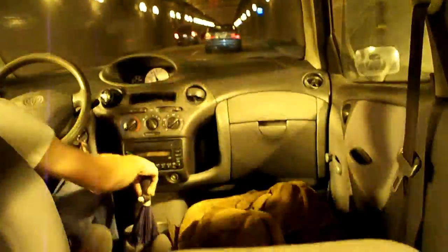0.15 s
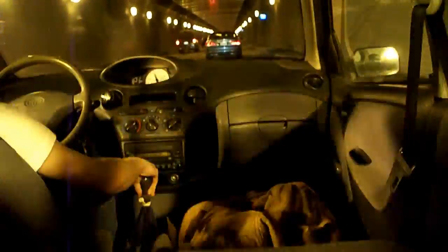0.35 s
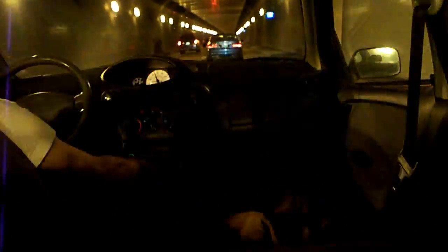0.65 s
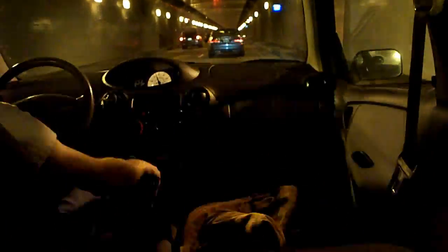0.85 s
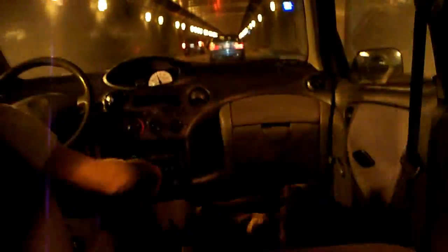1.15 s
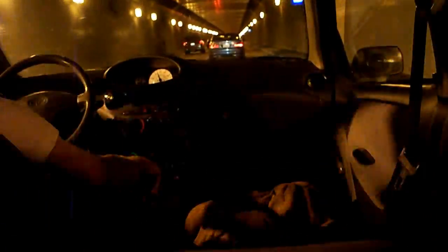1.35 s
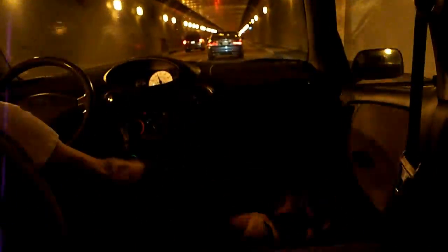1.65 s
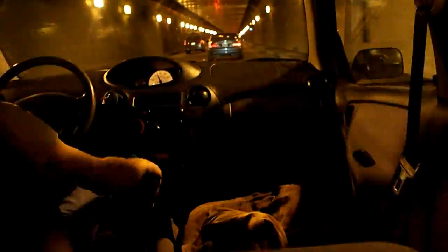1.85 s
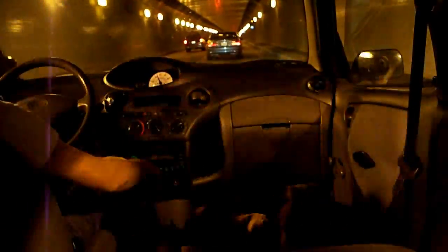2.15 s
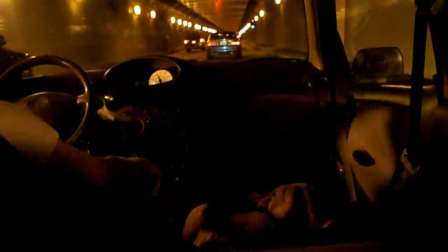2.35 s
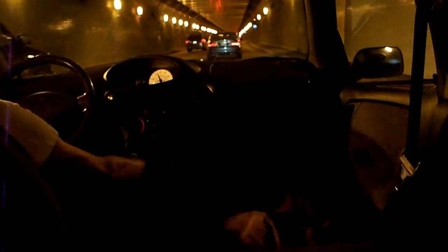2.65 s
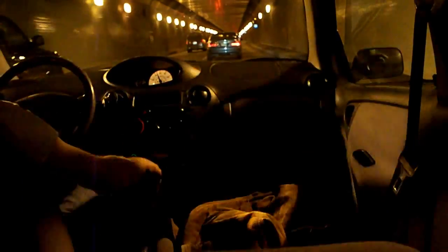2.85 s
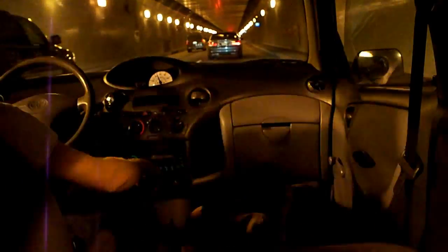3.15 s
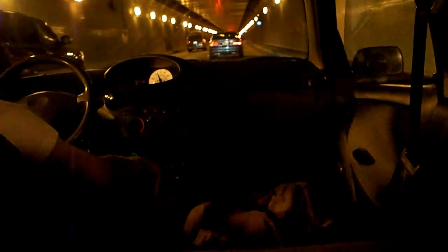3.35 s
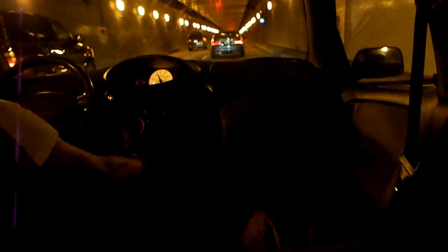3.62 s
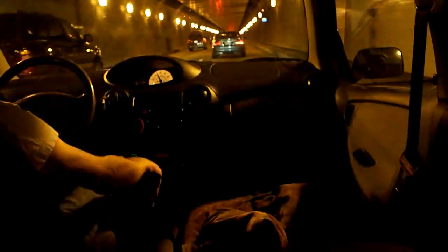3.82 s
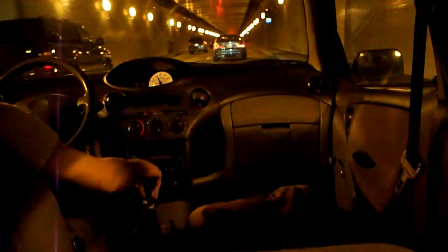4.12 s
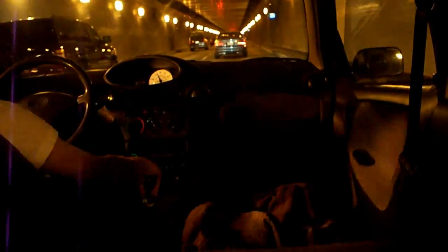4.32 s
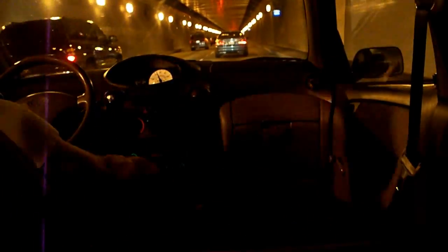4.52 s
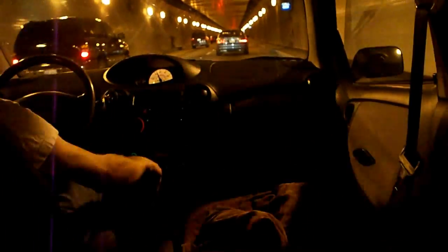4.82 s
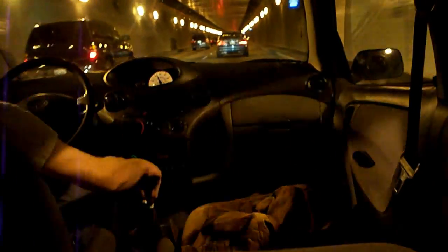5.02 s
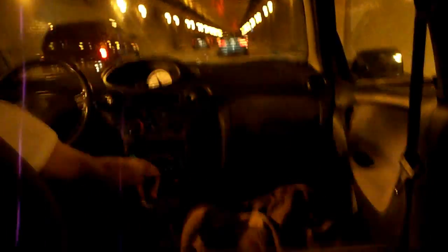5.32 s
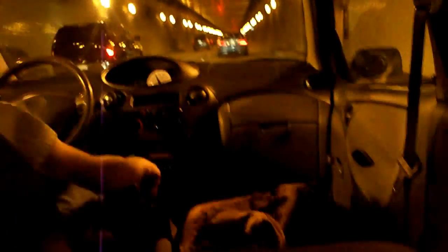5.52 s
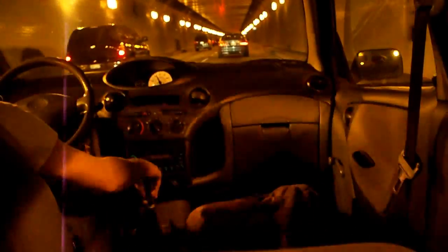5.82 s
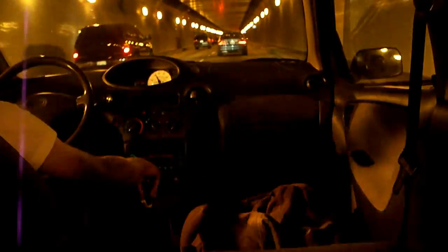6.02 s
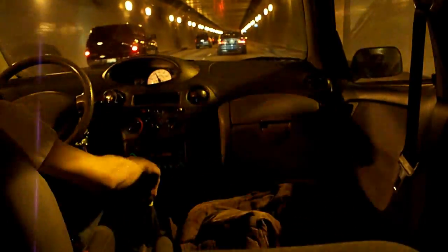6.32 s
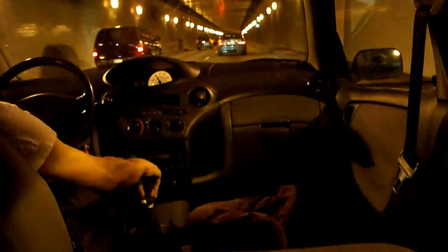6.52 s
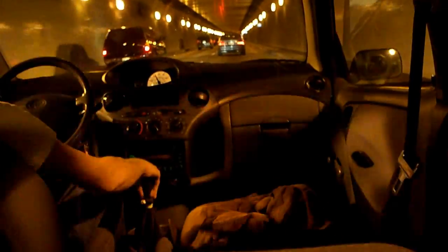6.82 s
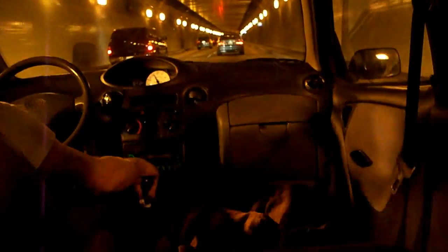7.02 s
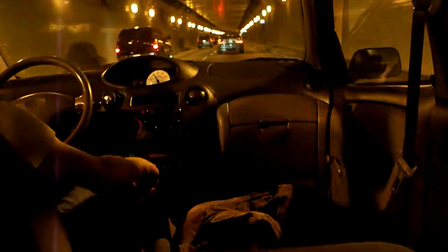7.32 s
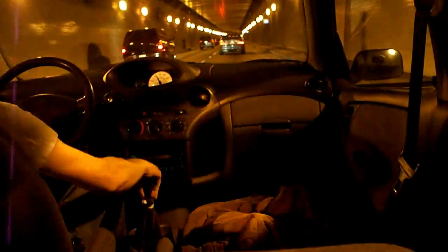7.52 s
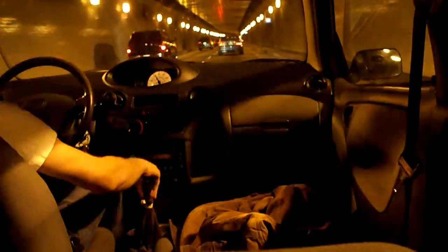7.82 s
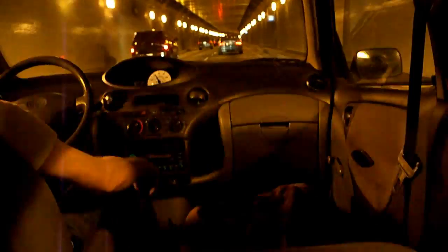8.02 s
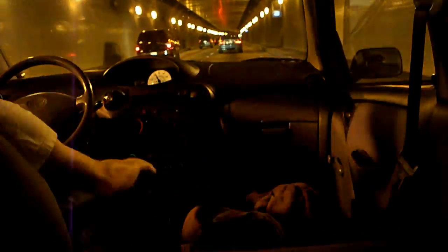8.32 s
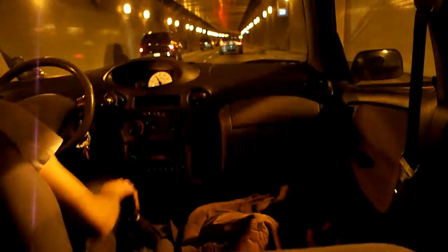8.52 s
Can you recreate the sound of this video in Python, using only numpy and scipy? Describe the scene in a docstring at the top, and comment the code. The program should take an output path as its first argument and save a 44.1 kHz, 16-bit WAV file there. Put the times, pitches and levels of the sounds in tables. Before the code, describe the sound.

Inside a small car cruising through a road tunnel, tyre roar and a broad rush lie over body rumble and a faint engine hum. Loose plastic trim rattles at the start, among thin clicks and dry ticks. Uneven road then brings tyre slaps, low booms and a few dull thuds. The rattling is densest just past the middle, then thins out while the roar carries on. It is heard from behind the front seats.

```python
"""Inside a small car cruising through a road tunnel, heard from behind the front seats.
From the start, tyre roar and a broad rush lie over body rumble, faint engine hum, hiss and crackle.
Loose plastic trim rattles at once, among thin, high clicks and dry ticks. Near 1 s uneven road begins
to slap the tyres and make the cabin boom; from 2 s there are a few short, dull, low thuds and pops.
The rattling is densest between 5 and 6 s, then thins out while the roar carries on."""
import sys
import numpy as np
from scipy.fft import rfft, irfft, next_fast_len
from scipy.io import wavfile
from scipy.ndimage import map_coordinates

SR = 44100
rng = np.random.default_rng(int(sys.argv[2]) if len(sys.argv) > 2 else 0)


def digitize_waveform(pressure):
    """Quantize a signal to 16-bit integers and store it at the path in sys.argv[1].

    Rows of a 2-D input are taken as channels; values are limited to [-1, 1].
    """
    field = np.atleast_2d(pressure).T
    bounded = np.clip(field, -1, 1)
    quanta = np.round(bounded * 32767).astype(np.int16)
    wavfile.write(sys.argv[1], SR, quanta)


N = 382112

# tyre roar, building over each coarse stretch of asphalt and dropping at its end: t/s, level/dB
ROAR_LEVELS = [(0.02, -34), (0.14, -32.5), (0.4, -33.5), (0.7, -31.5), (1.02, -29.5), (1.07, -36),
               (1.4, -30.5), (1.6, -33), (1.85, -30.5), (2.06, -29), (2.11, -33.5), (2.3, -30.5),
               (2.55, -30.5), (2.93, -30), (3.02, -27), (3.08, -30.5), (3.48, -25), (3.55, -34.5),
               (3.93, -32.3), (4.1, -28.5), (4.42, -27), (4.5, -30.5), (4.68, -28), (4.9, -30.5),
               (5.18, -29.5), (5.35, -33), (5.7, -29), (5.96, -28.5), (6.02, -31.5), (6.5, -31.5),
               (7.15, -32), (7.4, -30), (7.7, -33), (7.85, -31), (7.98, -28), (8.05, -33.5), (8.6, -30.5)]


def amp(db):
    """Amplitude ratio of a level in decibels."""
    return 10 ** (np.asarray(db) / 20)


def unit(x):
    """Normalisation to rms 1."""
    return x / np.sqrt(np.mean(x ** 2) + 1e-20)


def envelope(rows):
    """Linear interpolation of (t/s, level/dB) rows to one level per sample."""
    times, levels = np.transpose(rows)
    return np.interp(np.arange(N) / SR, times, levels)


def wobble(rate):
    """Smooth random modulation: a spline through rate knots a second."""
    knots = rng.standard_normal(int(N * rate / SR) + 4)
    return map_coordinates(knots, [np.arange(N) * rate / SR])


def filtered(x, response):
    """Zero-phase filtering: the spectrum of x times a response of frequency."""
    size = next_fast_len(len(x) + SR // 4)
    return irfft(rfft(x, size) * response(np.fft.rfftfreq(size, 1 / SR)), size)[:len(x)]


def coloured(x, points):
    """Spectral shaping by (f/Hz, level/dB) points on a log axis, cut off above the last."""
    f, db = np.transpose(points)
    return filtered(x, lambda hz: amp(np.interp(np.log(hz + 1), np.log(f), db, right=-120)))


def noise(points):
    """Gaussian noise of rms 1 with the given spectral shape."""
    return unit(coloured(rng.standard_normal(N), points))


def grains(rate, spread_db):
    """A Poisson train of unequal impulses, rms 1."""
    chance, size, sign = rng.random(N), rng.standard_normal(N), rng.choice([-1, 1], N)
    return unit((chance < rate / SR) * sign * amp(spread_db * np.clip(size, -2, 2)))


def add(track, s, sound):
    """Superposition of a sound on the track from time s."""
    start = max(0, round(s * SR))
    part = track[start:start + len(sound)]
    part += sound[:len(part)]


def tread(split_hz=815, sway_db=0.84, sway_rate=14):
    """Band noise of the tread in the tunnel: its halves swell independently, so the pitch wanders."""
    spectrum = [(500, -31.5), (655, -13.5), (718, -4), (790, -2.5), (880, -3.5), (950, -8), (1080, -14.5),
                (1400, -29)]  # tread noise: f/Hz, level/dB
    whole = noise(spectrum)
    lower = filtered(whole, lambda hz: 1 / (1 + (hz / split_hz) ** 20))
    return unit(sum(amp(sway_db * wobble(sway_rate)) * half for half in (lower, whole - lower)))


def rush_swing():
    """Level of the rush about its mean, in dB: a weighted sum of the swings of air noise and roar."""
    air_levels = [(0.03, -40), (0.63, -41.5), (0.84, -40), (1.25, -40), (1.96, -39), (2.18, -42),
                  (3.42, -38.5), (3.58, -39.5), (3.7, -39), (4.36, -38.3), (4.55, -40), (5.0, -39.5),
                  (5.2, -38), (5.35, -38), (5.5, -39), (5.78, -37.8), (6.08, -39.3), (6.25, -41),
                  (6.45, -41), (7.81, -39.5), (8.19, -40.5), (8.6, -39)]  # road and air noise through the doors: t/s, level/dB
    weights = (0.66, 0.63)  # dB of rush per dB of: air, roar
    air_db, roar_db = envelope(air_levels), envelope(ROAR_LEVELS)
    return weights[0] * (air_db - air_db.mean()) + weights[1] * (roar_db - roar_db.mean())


def road(roar_gain_db=0.16, rush_db=-36.5, grit_db=-7, flutter_db=0.73, uneven_db=0.52):
    """Rolling noise: uneven asphalt modulates the amplitude of roar and rush and adds small jolts."""
    rush_spectrum = [(180, -29), (310, -2.5), (400, 4), (520, 6.5), (680, -0.5), (1050, -8), (1300, -2),
                     (1650, 0.5), (2000, -6), (2500, -13.5), (3000, -22), (3600, -30.5), (4300, -41),
                     (6000, -63)]  # broad rush of road and air: f/Hz, level/dB
    texture_db = flutter_db * wobble(55) + uneven_db * wobble(24)
    roar = amp(envelope(ROAR_LEVELS) + roar_gain_db + texture_db) * tread()
    contact = rng.standard_normal(N) + amp(grit_db) * grains(rate=140, spread_db=3.0)
    rush = amp(rush_db + rush_swing() + 1.5 * texture_db) * unit(coloured(contact, rush_spectrum))
    return roar + rush


def rumble(jiggle_db=1.4):
    """Forced vibration: the road shakes the shell, which jiggles on its springs."""
    shake_levels = [(0.03, -42), (1.01, -41), (1.87, -41.5), (2.08, -33.5), (2.1, -43), (3.28, -38.5),
                    (3.49, -35.5), (3.54, -42.5), (4.37, -36.5), (5.02, -40), (5.04, -35), (6.98, -40),
                    (7.0, -34), (7.22, -43), (7.52, -39), (8.6, -39)]  # strength of the shaking: t/s, level/dB
    spectrum = [(8, -27), (24, -11), (58, -10), (92, -3), (113, -6), (140, 1.5), (215, 0), (290, -4.5),
                (380, -5), (600, -28)]  # vibration of the shell: f/Hz, level/dB
    return amp(envelope(shake_levels) + jiggle_db * wobble(20)) * noise(spectrum)


def engine(drift_hz=1.4, waver_db=1.0):
    """Periodic vibration at steady revs gives low tones, each wavering in frequency and level."""
    hums = [(108, -53.5), (133, -56.5), (201, -56.5), (247.6, -51.5), (266, -56)]  # engine and drive-line tones: f/Hz, level/dB
    out = np.zeros(N)
    for hz, db in hums:
        phase = 2 * np.pi * np.cumsum(hz + drift_hz * wobble(5)) / SR
        out += amp(db - waver_db * wobble(7.5)) * np.sqrt(2) * np.sin(phase)
    return out


def hiss(level_db=-67.0, rush_slope=0.92, flicker_db=1):
    """Amplitude-modulated treble noise that flickers and follows the rush."""
    spectrum = [(2500, -15.5), (3800, -14), (4500, -3), (5500, -1), (6400, 0.5), (7500, -3), (8400, -10.5),
                (9200, -16), (9800, -36.5)]  # thin hiss: f/Hz, level/dB
    return amp(level_db + rush_slope * rush_swing() + flicker_db * wobble(50)) * noise(spectrum)


def crackle(bright_db=-71.0, dull_db=-47.5, rush_slope=0.95):
    """Shot noise: each tiny impulse has a bright edge and a dull pop; both grow on coarse road."""
    specks = grains(rate=42, spread_db=3.7)
    bright = unit(coloured(specks, [(3000, -21.5), (4200, -6.5), (5400, 2), (7000, 0.5), (8200, -4),
                                    (9000, -16.5), (9900, -32)]))
    dull = unit(coloured(specks, [(80, -12), (250, 2.5), (900, 1), (1800, -7.5), (3000, -29.5),
                                  (4000, -43)]))
    return amp(rush_slope * rush_swing()) * (amp(bright_db) * bright + amp(dull_db) * dull)


def rebounds(s, count=3, gap_s=0.0055, first_db=-8.5, loss_db=5.5):
    """Inelastic impact: a blow and its ever weaker, unevenly spaced bounces, as (t/s, level/dB)."""
    times = s + np.cumsum(gap_s * (.5 + rng.random(count)))
    return [(s, 0)] + [(when, first_db - loss_db * k) for k, when in enumerate(times)]


def accented(modes, accent_hz, db_per_octave=25):
    """Selective excitation: where a blow lands favours the modes near one frequency."""
    return [(hz, db - db_per_octave * abs(np.log2(hz / accent_hz)), t60) for hz, db, t60 in modes]


def ring(modes, t, detune=0.056):
    """Free vibration: a sum of damped modes, each slightly off its usual pitch and level."""
    out = np.zeros(len(t))
    for hz, db, t60 in modes:
        decay = amp(db + 2 * rng.normal() - 60 * t / t60)
        mode_hz = hz * (1 + detune * rng.normal())
        out += decay * np.sin(2 * np.pi * (mode_hz * t + rng.random()))
    return out


def burst(x):
    """Normalisation of a transient to rms 1 over its first five milliseconds."""
    return x / np.sqrt(np.mean(x[:SR // 200] ** 2))


def trim(clack_db=-3.0, edge_db=-5.0, knock_db=-1.0, rasp_db=-3, rise_s=0.0003, rasp_t60=0.01):
    """Impact excitation: each contact rasps and rings the loose plastic, its edge and its panel."""
    # blows: t/s, clack level/dB, clack accent f/Hz, edge level/dB, edge accent f/Hz,
    # panel knock level/dB, rasp level/dB
    blows = [(0.1316, -25, 1650, -37, 2460, -37.5, -50), (0.1594, -25, 1690, -35, 2590, -33, -48.5),
             (0.1635, -34, 1390, -41, 2470, -25.5, -60), (0.2183, -25.5, 1460, -36, 2530, -33, -52.5),
             (0.2443, -25.5, 1750, -35, 2500, -36, -50), (0.2492, -31, 1680, -40, 2840, -25.5, -51),
             (0.3235, -28.5, 1770, -40, 2200, -31, -54), (0.3311, -37, 1510, -50, 2420, -31.5, -57),
             (0.6621, -35, 1620, -45, 2280, -34, -60), (0.9364, -31, 1330, -36.5, 2600, -45, -57),
             (0.9923, -31, 1370, -33.5, 2270, -26, -55), (0.9979, -42, 1140, -46, 2360, -24.5, -62),
             (1.034, -26.5, 1230, -33, 2520, -34, -50), (1.0698, -31, 1430, -31, 2460, -29, -48),
             (2.0555, -28, 1430, -40, 2210, -35, -59.5), (5.1635, -35, 1520, -42, 2390, -28, -55),
             (5.1839, -29, 1380, -43, 2350, -33, -53), (5.1928, -27.5, 1540, -40, 2800, -30, -47.5),
             (5.224, -30, 1450, -40, 2320, -42, -56), (5.248, -29, 1450, -41, 2410, -37, -54),
             (5.2612, -33, 1120, -32, 2630, -41, -50), (5.3043, -27.5, 1620, -39, 2380, -33.5, -41.5),
             (5.3098, -23.5, 1420, -28, 2540, -38.5, -53), (5.3378, -31, 1690, -33, 2680, -22.5, -49),
             (5.3613, -48, 1200, -46, 2870, -31, -57), (5.3689, -43, 1120, -35, 2570, -38, -47),
             (5.374, -28, 1160, -36, 2480, -34, -43), (5.3776, -32, 1200, -29, 2430, -34.5, -51),
             (5.4098, -31, 1760, -41, 2260, -43, -61), (5.4144, -31, 1810, -41, 2920, -40, -53),
             (5.43, -30, 1240, -44, 2840, -33, -54), (5.443, -30, 1590, -37, 2280, -39, -58),
             (5.461, -32, 1360, -50, 2390, -42, -60), (5.4706, -30, 1530, -38, 2810, -30, -48),
             (5.477, -24.5, 1370, -29.5, 2640, -32.5, -48), (5.495, -25.5, 1680, -39, 2610, -35.5, -56.5),
             (5.5045, -33, 1610, -35, 2400, -29, -53), (5.5138, -32, 1350, -42, 2270, -31, -55.5),
             (5.6287, -33, 1430, -36, 2230, -27, -61), (5.7631, -35, 1720, -46, 2240, -43, -66),
             (5.777, -28.5, 1770, -34, 2790, -22.5, -48.5), (5.8415, -34, 1650, -47, 2250, -34.5, -59),
             (5.932, -31, 1630, -40, 2190, -28, -61), (6.078, -33.5, 1540, -49, 2200, -26.5, -55),
             (6.784, -32, 1500, -42, 2680, -35, -57), (7.131, -34, 1130, -36, 2490, -31.5, -47.5),
             (7.14, -30, 1420, -33.5, 2350, -41, -45.5), (7.5929, -36, 1320, -38, 2550, -29.5, -53.5),
             (7.6023, -32, 1730, -44, 2180, -37, -61), (7.665, -33.5, 1580, -49, 2190, -41, -64),
             (7.762, -41, 1060, -36, 2610, -27.5, -51.5), (7.779, -30, 1220, -37, 2260, -39, -49),
             (8.423, -31.5, 1860, -38.5, 2170, -38.5, -58)]
    clack_modes = [(990, -2, 0.011), (1200, 0, 0.01), (1490, -3.5, 0.0079), (1685, -2.5, .011),
                   (1940, -3.5, .011)]  # loose plastic: f/Hz, level/dB, T60/s
    edge_modes = [(2210, 0.5, 0.016), (2380, 1.5, 0.014), (2690, -4.5, 0.01), (2860, -1.5, 0.011)]  # its stiff edge: f/Hz, level/dB, T60/s
    panel_modes = [(430, -0.5, .015), (547, 0, .017), (680, -3, .012)]  # hollow panel behind it: f/Hz, level/dB, T60/s
    rasp_spectrum = [(3000, -19), (4100, -10.5), (5000, -3), (5800, 4), (6700, 0), (7600, -7),
                     (8700, -15.5), (9900, -28)]  # gritty contact noise: f/Hz, level/dB
    ringing, rasps = np.zeros((2, N))
    t = np.arange(SR // 20) / SR
    onset = (1 - np.exp(-t / rise_s)) ** 2
    for s, clack, clack_hz, edge, edge_hz, knock, rasp in blows:
        contacts = rebounds(s)
        parts = [(accented(clack_modes, clack_hz), clack + clack_db),
                 (accented(edge_modes, edge_hz), edge + edge_db),
                 (panel_modes, knock + knock_db)]
        for modes, db in parts:
            for when, contact_db in contacts:
                add(ringing, when, amp(db + contact_db) * burst(onset * ring(modes, t)))
        for when, contact_db in contacts:
            grit = coloured(rng.standard_normal(len(t)), rasp_spectrum)
            scrape = onset * amp(-60 * t / rasp_t60) * grit
            add(rasps, when, amp(rasp + rasp_db + contact_db) * burst(scrape))
    return coloured(ringing, [(180, -11.5), (400, 3), (3000, 0.5), (3800, -4.5), (6000, -33)]) + rasps


def impulses(rows, gain_db):
    """One-sample impulses at (t/s, level/dB), each with a flat spectrum."""
    out = np.zeros(N)
    for s, db in rows:
        add(out, s, amp([db + gain_db]))
    return out


def high_clicks(gain_db=11):
    """Thin, high clicks: an impulse response that is brightest near 8 kHz."""
    onsets = [(0.2594, -45), (0.7218, -54), (1.022, -46), (1.2037, -47), (1.4202, -53), (1.512, -48),
              (1.5922, -45), (1.6284, -46), (2.085, -41), (2.2573, -50), (2.2734, -40.5), (3.3832, -49),
              (3.4832, -49), (3.493, -42), (3.5179, -45), (3.5225, -47), (3.5434, -44), (3.7746, -44),
              (3.803, -47), (4.1697, -52.5), (4.8848, -43.5), (4.993, -44), (5.083, -45), (6.098, -44),
              (6.1674, -47), (6.1848, -44), (7.0, -45), (7.0836, -43), (7.116, -42), (7.461, -47),
              (7.487, -42), (7.643, -45), (8.013, -44), (8.1678, -47), (8.4043, -44)]  # high clicks: t/s, level/dB
    response = [(3000, -21.5), (5400, -3), (7000, 2.5), (8200, 8.5), (9000, -13.5), (9900, -31.5)]
    return coloured(impulses(onsets, gain_db), response)


def ticks(gain_db=14.5):
    """Sharp, dry ticks: a broadband impulse response that peaks near 2 kHz."""
    onsets = [(0.345, -41), (0.843, -40.5), (2.84, -46), (3.268, -46), (3.338, -47), (4.3445, -34),
              (5.217, -39), (5.3452, -31.5), (5.8415, -45), (6.345, -36.5), (6.85, -44), (7.85, -40.5),
              (8.3433, -45)]  # dry ticks: t/s, level/dB
    response = [(300, -15.5), (2000, 13), (4500, 2.5), (6500, 1.5), (8500, -9.5), (9900, -28.5)]
    return coloured(impulses(onsets, gain_db), response)


def slaps(gain_db=-5, ring_hz=810, t60=0.052, attack_s=0.00041, blur_rad=0.034):
    """Damped oscillation: the slapped tread rings at the pitch of the roar; the shell muffles it."""
    spots = [(0.837, -10.5), (0.958, -21), (1.738, -17), (2.041, -14), (2.065, -18), (2.357, -16),
             (2.763, -15.5), (3.006, -14), (3.135, -20), (3.337, -16), (3.446, -11), (3.477, -15),
             (4.064, -13.5), (4.728, -17.5), (5.609, -17), (5.677, -11.5), (5.892, -12.5), (7.251, -17.5),
             (7.576, -14), (7.828, -13.5)]  # the tyres strike uneven spots: t/s, level/dB
    out, t = np.zeros(N), np.arange(SR // 8) / SR
    for s, db in spots:
        jitter = rng.standard_normal(len(t))
        hz = ring_hz * (1 + 0.069 * jitter[0])
        phase = 2 * np.pi * hz * t + blur_rad * np.cumsum(jitter)  # a random walk broadens the tone
        swell = (1 - np.exp(-t / attack_s)) * amp(-60 * t / t60)
        add(out, s, amp(db + gain_db) * swell * np.sin(phase))
    return coloured(out, [(2000, 1.5), (4000, -23.0), (9000, -32.5)])


def damped_tones(onsets, hz, detune, attack_s, t60, samples):
    """A damped sinusoid swells and decays from each onset, at a slightly different pitch each time."""
    out, t = np.zeros(N), np.arange(samples) / SR
    swell = (1 - np.exp(-t / attack_s)) * amp(-60 * t / t60)
    for s, db in onsets:
        tone_hz = hz * (1 + detune * rng.normal())
        add(out, s, amp(db) * swell * np.sin(2 * np.pi * tone_hz * t))
    return out


def booms(gain_db=-2.5):
    """Cavity resonance: each bump makes the cabin air boom."""
    bumps = [(0.927, -21.5), (2.03, -40), (5.067, -22.5), (5.189, -25.5), (5.83, -25), (6.021, -24),
             (6.988, -20.5), (7.571, -25)]  # bumps in the road: t/s, level/dB
    cabin = damped_tones(bumps, hz=90, detune=0.059, attack_s=0.014, t60=0.22, samples=SR // 3)
    return amp(gain_db) * cabin


def thuds():
    """Heavy damping: low tones that die within a few cycles are heard as short, dull thuds and pops."""
    onsets = [(2.068, -17.5), (2.995, -21), (3.474, -22), (5.611, -17), (6.097, -21), (6.165, -19)]  # low thuds and pops: t/s, level/dB
    return damped_tones(onsets, hz=185, detune=0.076, attack_s=0.0053, t60=0.045, samples=SR // 6)


def scene():
    """Superposition of all sources at one point behind the front seats."""
    continuous = road() + rumble() + engine() + hiss() + crackle()
    return (continuous + trim() + high_clicks() + ticks() + slaps() + booms() + thuds())[None]


def record(dry, top_hz=9850):
    """Band limiting: an ideal low-pass filter removes the highest treble."""
    return np.array([filtered(channel, lambda hz: hz < top_hz) for channel in dry])


dry = scene()
out = record(dry)
digitize_waveform(out)
```